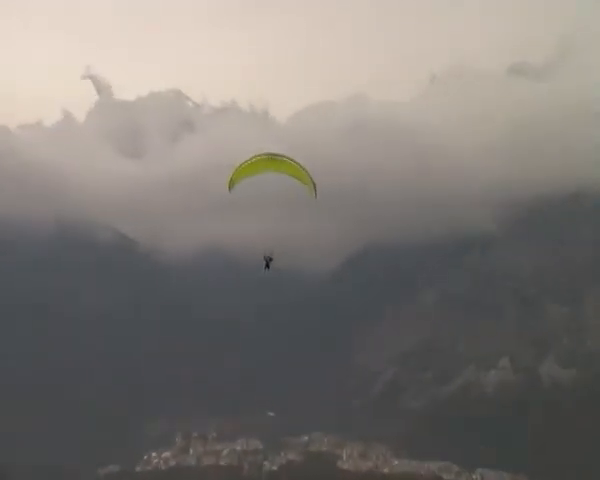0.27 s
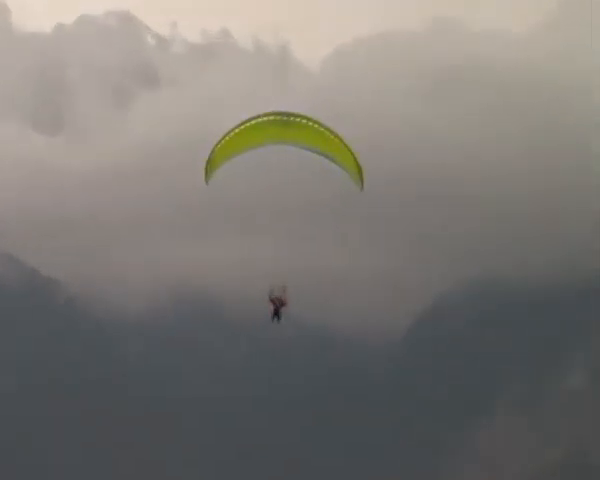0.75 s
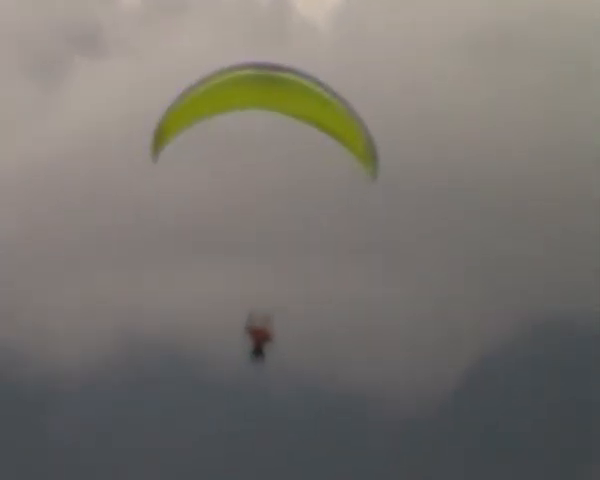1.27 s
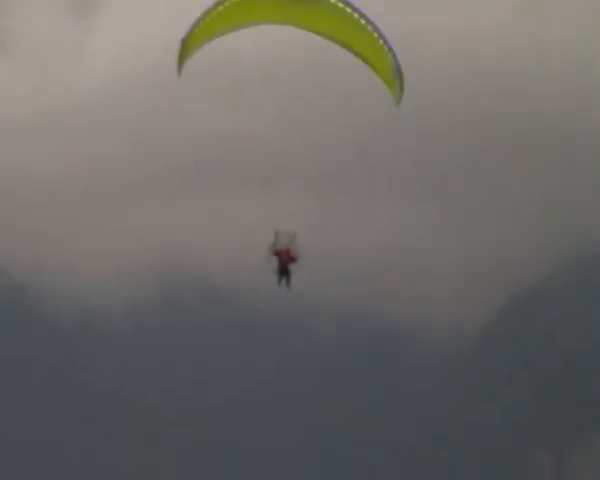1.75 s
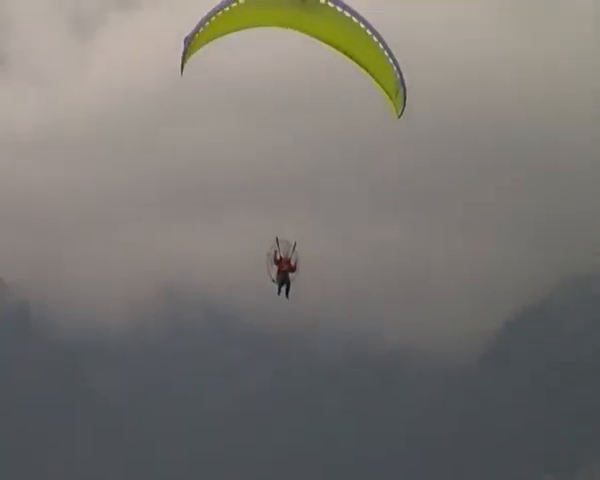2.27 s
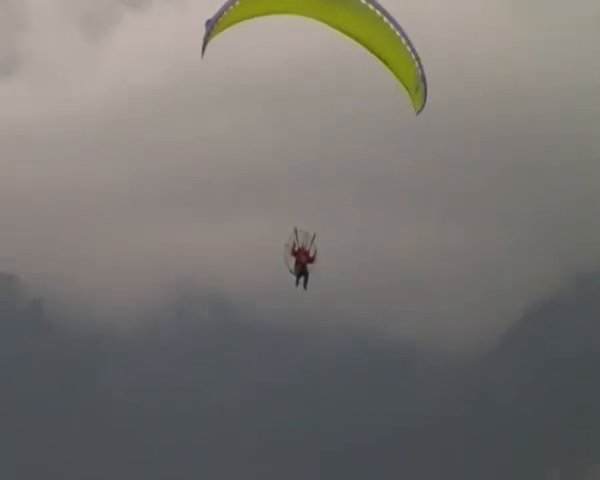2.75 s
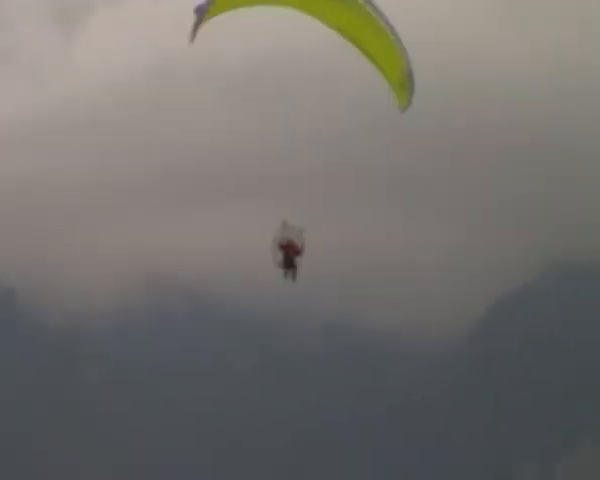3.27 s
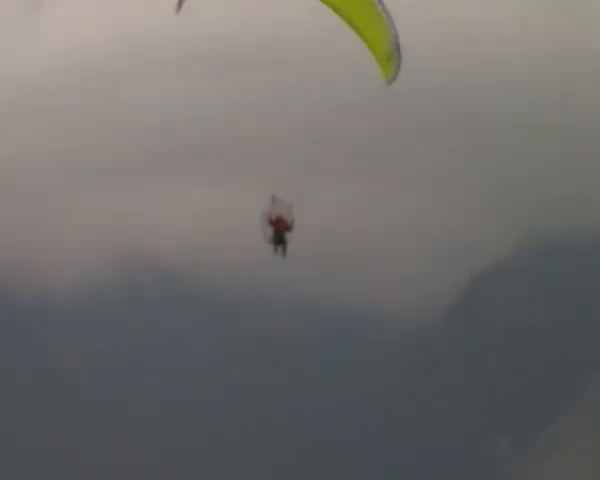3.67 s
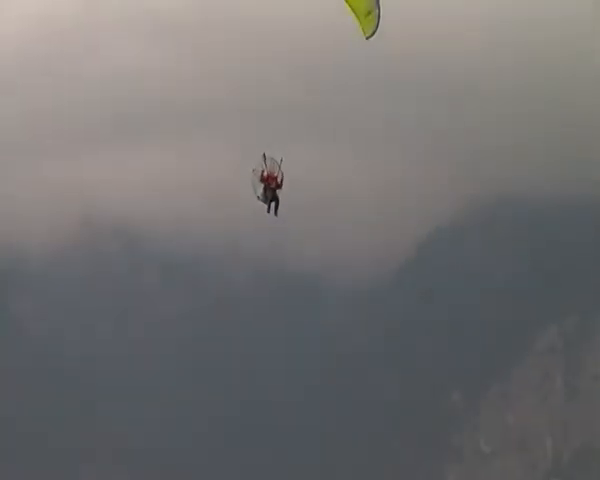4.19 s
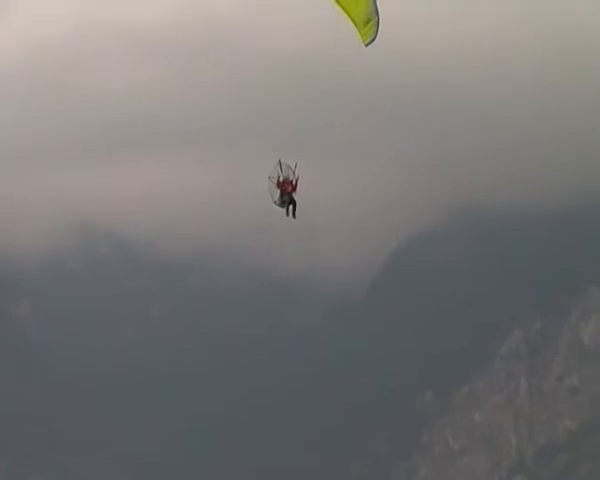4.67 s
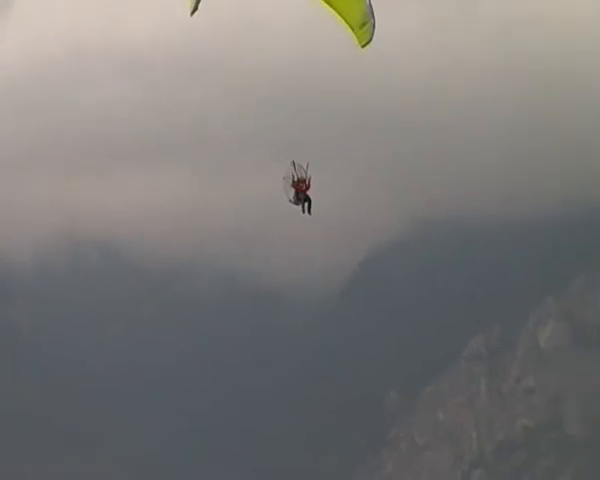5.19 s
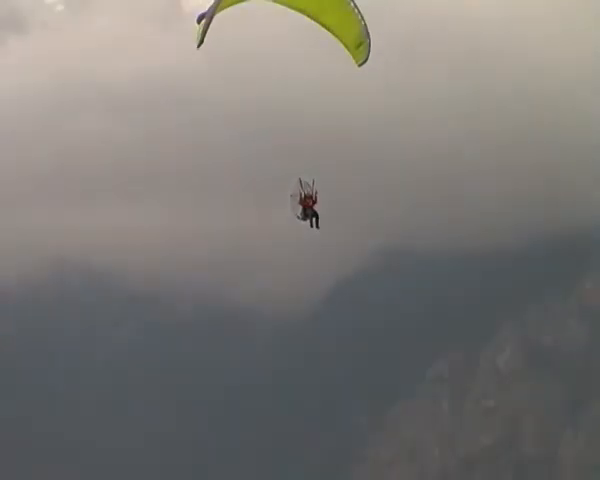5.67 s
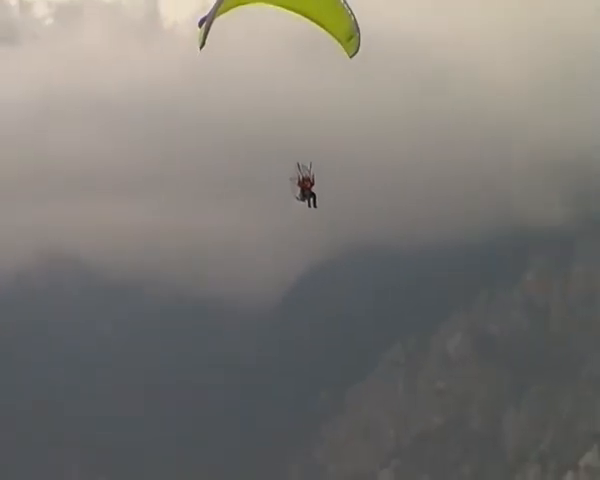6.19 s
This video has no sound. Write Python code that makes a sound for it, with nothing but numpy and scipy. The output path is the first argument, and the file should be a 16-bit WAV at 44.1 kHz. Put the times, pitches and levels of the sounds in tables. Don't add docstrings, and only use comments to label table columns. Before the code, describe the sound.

Rough wind buffets a handheld camera outdoors while a paramotor's nasal engine drone and propeller chop swell, fade under gusts, then return.

```python
import sys
import numpy as np
from scipy import signal
from scipy.fft import rfft, irfft, next_fast_len
from scipy.io import wavfile
from scipy.ndimage import uniform_filter1d, map_coordinates

SR = 44100
rng = np.random.default_rng(int(sys.argv[2]) if len(sys.argv) > 2 else 0)


def nominal_scale(level):
    x = np.asarray(level, float) / 20
    return 10 ** x


def materialize(psi):
    bounded = np.clip(np.atleast_2d(psi).T, -1, 1)
    quanta = np.round(bounded * 32767).astype(np.int16)
    wavfile.write(sys.argv[1], SR, quanta)


N = 283563
T = np.arange(N) / SR


def unit(x):
    return x / np.sqrt(np.mean(x ** 2) + 1e-20)


def along(points, hz):
    f, v = np.transpose(points)
    return np.interp(np.log(hz + 1), np.log(f + 1), v)


def curves(rows):
    s, *columns = np.transpose(rows)
    return [np.interp(T, s, column) for column in columns]


def wobble(rate):
    knots = rng.standard_normal(int(N * rate / SR) + 4)
    return map_coordinates(knots, [np.arange(N) * rate / SR])


def noise(ports):
    return rng.standard_normal((ports, N))


def filtered(x, response):
    m = next_fast_len(N + 8192)
    return irfft(rfft(x, m) * response(np.fft.rfftfreq(m, 1 / SR)), m)[..., :N]


def coloured(x, spectrum):
    return unit(filtered(x, lambda hz: nominal_scale(along(spectrum, hz))))


def treble(hz, above_hz):
    return 1 / (1 + (above_hz / (hz + 1)) ** 4)


def echo(x, share, delay, turn, above_hz):
    def response(hz):
        late = np.exp(1j * (turn - 2 * np.pi * hz * delay))
        return 1 + share * treble(hz, above_hz) * late
    return filtered(x, response)


# start_s [s], level_db [dB]
NEARNESS = [(0.0, -38), (0.08, -27.5), (0.5, -37.5), (0.85, -28.5), (1.3, -28.5), (1.75, -28.5),
            (2.05, -20), (2.42, -24.5), (2.55, -16.5), (3.05, -19), (3.2, -25.5), (3.7, -25), (4.15, -24.5),
            (4.6, -32.5), (5.0, -38.5), (5.4, -33.5), (5.8, -30.5), (6.43, -23)]
# frequency_hz [Hz], level_db [dB per Hz]
SURF_COLOUR = [(500, -20), (2000, 16), (6000, 3), (9600, -3), (11600, -28.5), (13000, -66.5)]


def surf():
    craft = nominal_scale(curves(NEARNESS)[0] - 27.5)
    sea = nominal_scale([[-59], [-56]])
    return (craft + sea) * coloured(noise(2), SURF_COLOUR)


def gusts(rows):
    power = nominal_scale(2 * -45) * np.ones(N)
    for middle, db, length in rows:
        power += nominal_scale(2 * db) * np.exp(-np.abs(2 * (T - middle) / length) ** 3)
    return power


def thuds(rows):
    over_db, cycles = 2.5, 0.809
    out, t = np.zeros(N + 2000), np.arange(-1000, 1000) / SR
    for s, db, hz in rows:
        envelope = nominal_scale(db + over_db) * np.exp(-(t * hz / cycles) ** 2)
        turn = rng.uniform(0, 2 * np.pi)
        out[round(s * SR):][:len(t)] += envelope * np.cos(2 * np.pi * hz * t + turn)
    return out[1000:N + 1000]


# middle_s [s], level_db [dB], length_s [s]
LEFT_GUSTS = [(0.104, -31, 0.085), (0.49, -25, 0.41), (0.886, -30.5, 0.21), (1.049, -26, 0.051),
              (1.145, -27, 0.015), (1.243, -28.5, 0.048), (1.372, -27.5, 0.057), (1.598, -22, 0.17),
              (1.814, -24, 0.064), (1.947, -34.5, 0.15), (2.131, -28.5, 0.05), (2.312, -28.5, 0.13),
              (3.035, -33.5, 0.13), (3.383, -28.5, 0.308), (3.694, -25.5, 0.092), (3.857, -33.5, 0.067),
              (4.031, -27, 0.1), (4.459, -21.5, 0.504), (4.938, -22, 0.18), (5.204, -31, 0.16),
              (5.767, -26.5, 0.44), (6.274, -29.5, 1)]
RIGHT_GUSTS = [(0.294, -31.5, 0.68), (0.337, -23, 0.051), (0.417, -18.5, 0.02), (0.805, -28.5, 0.27),
               (1.052, -28, 0.046), (1.161, -26, 0.021), (1.26, -25.5, 0.01), (1.518, -27.5, 0.097),
               (2.066, -31.5, 0.18), (2.643, -43.5, 0.39), (3.095, -39, 0.37), (3.358, -30, 0.03),
               (3.466, -23, 0.03), (3.675, -39.5, 0.13), (3.846, -31.5, 0.04), (3.978, -31.5, 0.013),
               (4.347, -29, 0.092), (4.591, -25.5, 0.21), (5.045, -19.5, 0.491), (5.631, -23.5, 0.299),
               (6.041, -21, 0.188), (6.279, -32.5, 0.15)]
# middle_s [s], level_db [dB], pitch_hz [Hz]
LEFT_THUDS = [(0.273, -20, 186), (0.33, -19, 220), (0.376, -12.5, 289), (0.416, -22, 302),
              (0.445, -22.5, 248), (0.532, -12, 259), (0.685, -16, 231), (0.788, -17.5, 202),
              (0.872, -17, 203), (1.047, -16, 261), (1.143, -20.5, 201), (1.231, -17.5, 243),
              (1.258, -25, 161), (1.385, -19.5, 212), (1.492, -17.5, 210), (1.529, -20.5, 223),
              (1.557, -17.5, 184), (1.627, -18, 245), (1.655, -17, 255), (1.808, -21, 175.8),
              (2.134, -24.5, 269), (2.261, -18, 183.4), (2.303, -22.5, 199), (2.341, -20, 170),
              (2.368, -21.5, 167), (3.181, -22, 189), (3.257, -21, 180), (3.304, -20.0, 177),
              (3.461, -17, 246), (3.648, -17, 262), (3.673, -21, 175), (3.711, -20.5, 192),
              (3.75, -21.5, 165), (3.883, -23, 167), (3.991, -17.5, 174), (4.048, -19, 189),
              (4.201, -17.5, 186), (4.227, -17.5, 253), (4.289, -9.5, 241), (4.325, -14, 232),
              (4.362, -17, 196), (4.388, -18, 303), (4.437, -16, 251.5), (4.474, -10.5, 213),
              (4.589, -19.5, 248), (4.617, -14.5, 260), (4.641, -11.5, 222), (4.672, -15.0, 208),
              (4.842, -17.0, 217), (4.924, -16, 240), (4.971, -14.5, 202), (5.051, -18, 240),
              (5.872, -16.0, 210), (5.922, -17.5, 217), (6.305, -21, 170)]
RIGHT_THUDS = [(0.25, -20.5, 195), (0.34, -18, 229.3), (0.417, -15.5, 243), (0.474, -28.5, 250),
               (0.687, -20, 232), (0.721, -26, 205), (0.772, -16.5, 218), (0.828, -27.5, 199),
               (0.911, -22, 236), (1.043, -18.5, 267), (1.068, -19, 274), (1.165, -29.5, 153),
               (1.258, -19.5, 165), (2.013, -19.5, 324), (2.048, -22.5, 174), (2.077, -26, 214),
               (2.139, -25, 196), (3.163, -25, 155), (3.197, -21.5, 217), (3.354, -19.5, 192),
               (3.464, -18, 212), (3.658, -25, 311), (3.751, -24.5, 166), (3.857, -26, 211),
               (3.984, -23, 183), (4.359, -20, 238), (4.53, -21.5, 275), (4.595, -18.5, 219.3),
               (4.658, -13.5, 208.5), (4.747, -18.5, 217), (4.797, -13.5, 181.3), (4.827, -12, 292.8),
               (4.933, -12, 249), (5.016, -12, 285.2), (5.142, -15.5, 262.6), (5.167, -12, 260),
               (5.199, -12.5, 257.3), (5.256, -14, 181.2), (5.308, -12.5, 238), (5.395, -18.5, 190),
               (5.47, -16.5, 186), (5.524, -17.5, 212), (5.607, -12, 337), (5.651, -12, 275.2),
               (5.697, -16, 242.2), (5.723, -15, 223.6), (5.749, -13.5, 240.5), (5.816, -19.5, 264),
               (5.97, -16.5, 283.4), (6.028, -13.5, 228), (6.053, -17, 198.6), (6.091, -12, 199.8),
               (6.147, -16.5, 256.8), (6.249, -21.5, 192), (6.272, -21.5, 201)]
# frequency_hz [Hz], level_db [dB per Hz]
BUFFET_COLOUR = [(30, -50), (80, -10.5), (130, -3.5), (200, -1.5), (380, -7), (540, -13), (1300, -29),
                 (3000, -51), (6000, -91.5)]
RUMBLE_COLOUR = [(15, -42.5), (30, -20.5), (60, -9.5), (100, -5), (160, -6.5), (300, -32.5), (800, -76.5)]
CRACK_COLOUR = [(300, -27), (1500, 0), (4500, 3), (9600, -2.5), (10800, 1), (12000, -60)]


def wind():
    power = np.array([gusts(LEFT_GUSTS), gusts(RIGHT_GUSTS)])
    lumps = nominal_scale([1.7 * wobble(18) + 4.13 * wobble(130) for _ in range(2)])
    flow = coloured(lumps * noise(2), BUFFET_COLOUR)
    evenness = 0.542
    recent = np.abs(uniform_filter1d(flow ** 2, size=SR // 50))
    flow = unit(flow / (recent + .05) ** (evenness / 2))
    buffet = nominal_scale(-0.13) * np.sqrt(power) * flow + np.array([thuds(LEFT_THUDS), thuds(RIGHT_THUDS)])

    wind_db = 10 * np.log10(uniform_filter1d(power.mean(axis=0), size=SR // 10))
    deep_db = 0.12 * (wind_db - wind_db.mean()) + 1.8 * wobble(18)
    lull_s, lull_length_s, lull_db = 2.6, .28, -10
    deep_db = deep_db + lull_db * np.exp(-(2 * (T - lull_s) / lull_length_s) ** 2)
    port_db = np.array([[-34], [-36.5]])
    rumble = nominal_scale(port_db + deep_db) * coloured(noise(2), RUMBLE_COLOUR)

    swing = 0.669 * np.tanh(buffet / 0.7516)
    steep = np.abs(np.gradient(swing, axis=1))
    ticks = np.maximum(steep - .006, 0) * noise(2)
    ticks = filtered(ticks, lambda hz: nominal_scale(along(CRACK_COLOUR, hz)))
    return swing + rumble + nominal_scale(1.5) * ticks


# start_s [s], peak_db [dB], left_minus_right_db [dB]
HARD_BLOWS = [(0.1094, -38, -11.5), (0.1448, -37.5, -14.5), (0.251, -39, 6), (0.2693, -41, -11),
              (0.327, -46.5, -5), (0.3421, -48, 8), (0.415, -38.5, -4), (0.4931, -42.5, -19),
              (0.881, -37, 8), (1.057, -40, 6.5), (1.253, -38, -7.5), (1.351, -41, 15),
              (1.391, -36.5, 12.5), (1.6257, -42.5, 2), (1.6767, -40, 14.5), (3.337, -42, -10),
              (3.745, -36.5, -2), (3.8315, -39, 5), (3.856, -42, -26), (3.8858, -37, 8), (4.2885, -39, 4),
              (4.3903, -44.5, -9), (4.4729, -42, 6), (4.5387, -41, -3.5), (4.668, -41.5, 8),
              (4.706, -39, 14.5), (5.053, -45.5, -18.5), (5.3948, -32.5, -15), (5.468, -38, -20),
              (5.544, -48.5, 9)]


def cracks():
    out, t = np.zeros((2, N + 800)), np.arange(800) / SR
    for s, db, pan_db in HARD_BLOWS:
        burst = nominal_scale(db + 3 - 60 * t / .018) * rng.standard_normal((2, len(t)))
        balance = nominal_scale([[min(pan_db, 0)], [-max(pan_db, 0)]])
        out[:, round(s * SR):][:, :len(t)] += burst * balance
    return filtered(out[:, :N], lambda hz: nominal_scale(along(CRACK_COLOUR, hz)))


# start_s [s], depth_db [dB], fall_s [s]
GAIN_DUCKS = [(0.087, 9, 0.054), (0.254, 4, 0.022), (0.378, -0.32, 0.012), (0.414, 4.5, 0.012),
              (0.676, 1.5, 0.0613), (0.875, 8, 0.011), (0.949, 4.5, 0.0387), (1.037, 7, 0.0246),
              (1.23, 7.5, 0.0497), (1.377, 7, 0.0147), (1.556, 2, 0.052), (1.61, 6.5, 0.072),
              (1.92, 2.5, 0.038), (2.036, 7, 0.0085), (2.139, 6.5, 0.038), (2.306, 3, 0.0905),
              (2.532, 1.5, 0.027), (2.923, 4.5, 0.012), (3.07, 7.5, 0.0505), (3.278, 4.5, 0.049),
              (3.441, 4, 0.0987), (3.746, 10, 0.01), (3.831, 9.5, 0.0642), (3.993, 4, 0.092),
              (4.154, 3, 0.129), (4.281, 7.5, 0.086), (4.455, 6, 0.031), (4.653, 3, 0.0905),
              (5.07, 6.5, 0.0163), (5.397, 4.5, 0.0203)]


def ducking():
    recover_db_per_s = 65
    down_db = np.zeros(N)
    for s, depth_db, fall in GAIN_DUCKS:
        falling = depth_db * (T - s) / fall
        recovering = depth_db - recover_db_per_s * (T - s - fall)
        down_db += np.maximum(np.minimum(falling, recovering), 0)
    return nominal_scale(-down_db)


# frequency_hz [Hz], level_db [dB per Hz]
THUMP_COLOUR = [(60, -35.5), (150, -16), (240, 13), (450, 0.5), (650, 8), (900, 2.5), (1050, 3.5),
                (1200, 2), (1450, 1), (1800, 0.5), (2300, 0.5), (3200, -9), (5000, -16.5), (8000, -66.5),
                (11500, -60.5)]
ROAR_COLOUR = [(88, -54.5), (150, -19), (291, -6), (480, -12.5), (663, 0.5), (738, -6.5), (807, 0.5),
               (867, -9), (1360, -9), (1700, -7.5), (1880, -12), (2200, -8.5), (3040, -12.5), (8270, -37.5),
               (10800, -104), (14100, -134), (22000, -120)]


def propeller(passes):
    count = np.floor(passes).astype(int)
    size = nominal_scale(rng.normal(0, 0.39, count.max() + 1))[count]
    thumps = np.diff(count, prepend=count[0]) * size
    tearing = np.exp(-(passes % 1) / .17) * size * rng.standard_normal(N)
    blade = coloured(-thumps, THUMP_COLOUR) + 0.366 * coloured(tearing, ROAR_COLOUR)
    return unit(echo(blade, share=0.41, delay=0.0051, turn=0, above_hz=3100))


# start_s [s], turned_away [0-1], note_db [dB], upper_db [dB]
PILOT_TURN = [(0, 0.21, -6, -6.5), (0.65, 0.09, -9, -4), (1.3, 0.1, -4.5, -4.5), (1.9, 0.17, -1, 1),
              (2.5, 0.18, -0.8, 4.5), (3.05, 0.23, -1.65, 2.5), (3.6, 0.14, -0.5, 2.77),
              (4.1, 0.41, -1.97, 2), (4.6, 0.31, -2.28, 5.5), (5.1, 0.84, -2, 5.5), (5.6, 0.93, -4.25, 0),
              (6.0, 0.67, -1.5, 5), (6.43, 0.8, -1.83, 3.5)]
# start_s [s], air_db [dB], air_treble_db [dB], high_partials_db [dB]
CAGE_BEAM = [(0, 0, -1, -1), (.4, 0, 0, 0), (.8, 0, -0.5, 1), (1.3, 0, -0.5, -0.5), (1.7, 0, -1, 1),
             (2.02, 0, 0.5, 1), (2.3, 0, 0, 1.5), (2.6, 0, 1, 0), (3.0, 0, 1, -0.5), (3.3, -0.5, 1, -0.5),
             (3.7, 0, -0.5, -1), (4.1, -1, 0.5, -7.5), (4.5, 0, 0.5, -2), (4.9, -1.5, -2, -5),
             (5.4, 0, 1, -0.5), (5.8, -0.5, 0.5, 1.5), (6.2, 0.5, 2.5, 2.5), (6.43, 0, -3.5, -1)]
# multiple [of firing rate], level_db [dB]
PARTIALS_FACING = [(1, -17), (2, -26), (3, -24.5), (4, -14), (5, 1), (6, 10.5), (7, -1), (8, -6), (9, -9.5),
                   (10, -1), (11, -7.5), (12, -4), (13, -14.5), (14, -27), (15, -42.5), (16, -15),
                   (17, -26.5), (18, -19), (19, -19), (20, -32), (21, -37), (22, -42), (23, -23.5),
                   (24, -24.5), (25, -25.5), (26, -39), (27, -46.5), (35, -41.5), (36, -44), (38, -47.5),
                   (39, -44)]
PARTIALS_AWAY = [(1, -16.5), (2, -4.5), (3, -6.5), (4, -15), (5, 0), (6, 5), (7, -9.5), (8, -2.5), (9, -11),
                 (10, -5.5), (11, -3.5), (12, -5.5), (13, -12.5), (14, -11), (15, -28.5), (16, -20.5),
                 (17, -50.5), (18, -37), (19, -41), (20, -23.5), (21, -34.5), (22, -43.5), (23, -21),
                 (24, -22.5), (25, -20.5), (26, -35), (27, -26.5), (35, -27.5), (36, -29), (38, -33.5),
                 (39, -34)]
# middle_s [s], gain_db [dB]
TONE_FLARES = [(.245, 4), (.95, 3.5), (1.55, 8), (2.019, 4), (2.62, 1.5), (2.78, 2.5), (2.903, 4.5),
               (4.16, 3), (4.94, 4), (5.385, 6), (5.71, 4.5), (5.84, 1), (6.2, 2.5), (6.38, 3)]


def exhaust(firings, away, near_db):
    flare_length_s, upper_share = 0.0356, .6
    note_db, upper_db = curves(PILOT_TURN)[1:]
    high_db = curves(CAGE_BEAM)[2]
    top_db = 0.36 * away * (near_db - near_db.mean())
    flare_db = sum(db * np.exp(-(2 * (T - s) / flare_length_s) ** 2) for s, db in TONE_FLARES)
    drift = .004 * wobble(25)
    out = np.zeros(N)
    for (k, facing_db), (_, away_db) in zip(PARTIALS_FACING, PARTIALS_AWAY):
        aim_db = note_db * ((k == 6) + .5 * (k == 5))
        aim_db = aim_db + (upper_db - (1 - upper_share) * flare_db) * (k > 8)
        aim_db = aim_db + high_db * (k > 13) + top_db * (k > 19)
        level_db = facing_db + away * (away_db - facing_db) + aim_db + 1.74 * wobble(9)
        late = .52 * max(k - 7.5, 0)
        phase = 2 * np.pi * (k * (firings + drift) - late) + .2 * wobble(14)
        out -= nominal_scale(level_db) * np.cos(phase)
    steady = out / np.sqrt(uniform_filter1d(out ** 2, size=SR // 4))
    return nominal_scale(flare_db + 0.446 * note_db) * steady


# frequency_hz [Hz], level_db [dB per Hz]
RASP_COLOUR = [(530, -41), (900, -6.5), (958, -9), (1010, -3.5), (1300, -1), (1580, 2.5), (1920, -23),
               (2110, -11.5), (2740, -17.5), (3140, -16), (3550, -15.5), (8520, -40.5), (10800, -80.5),
               (14100, -115), (22000, -120)]
RING_COLOUR = [(2400, -31), (2900, -4.5), (3150, 5.5), (3350, -8.5), (3600, -21), (4400, -15.5),
               (4750, -26.5), (5050, -13), (5400, -28), (6000, -41.5)]


def pipe_noise(firings):
    puffs = np.exp(-((firings - .45) % 1) / 0.25)
    rasp = coloured(puffs * rng.standard_normal(N), RASP_COLOUR)
    outlet = np.clip((T - 5.72) / 0.27, 0, 1)
    ring = nominal_scale(-20) * outlet * coloured(puffs * rng.standard_normal(N), RING_COLOUR)
    return rasp, ring


# frequency_hz [Hz], width_hz [Hz], gain_db [dB]
CAGE_BEHIND = [(2250, 700, -1.5), (2827, 160, -3), (3565, 250, -3), (4500, 246, 4), (4733, 180, -7),
               (5020, 250, 5), (5355, 200, -5), (5650, 140, 4), (5950, 150, -4), (6230, 250, 1)]


def off_the_cage(air, away, near_db):
    def behind(hz):
        return nominal_scale(sum(db * np.exp(-((hz - c) / w) ** 2) for c, w, db in CAGE_BEHIND))
    facing = echo(air, share=0.48, delay=0.00117, turn=4.1, above_hz=1500)
    turned = filtered(air, behind)
    clear = np.clip((near_db + 28) / 8, 0, 1)
    air = air + clear * (facing - air)
    back_view = np.clip((away - 0.18) / (0.396 - 0.18), 0, 1)
    air = air + back_view * (turned - air)
    treble_db = curves(CAGE_BEAM)[1]
    return air + (nominal_scale(treble_db) - 1) * filtered(air, lambda hz: treble(hz, 2500))


# start_s [s], rate_hz [firings per s]
ENGINE_SPEED = [(0.0, 135.23), (0.4, 135.28), (0.8, 135.1), (1.2, 134.57), (1.6, 134.57), (2.0, 134.23),
                (2.4, 134.18), (2.8, 133.98), (3.2, 133.21), (3.6, 132.49), (4.0, 132.09), (4.4, 130.86),
                (4.8, 131.12), (5.2, 130.14), (5.6, 129.06), (6.0, 128.57), (6.42, 128.38)]


def paramotor():
    near_db, = curves(NEARNESS)
    away = curves(PILOT_TURN)[0]
    firings = np.cumsum(curves(ENGINE_SPEED)[0]) / SR
    rasp, ring = pipe_noise(firings)
    wash = coloured(rng.standard_normal(N), ROAR_COLOUR) * nominal_scale(2.15 * wobble(30))
    belt = 2 / 3.636
    air = nominal_scale(2.5 - 3.7 * away) * propeller(belt * firings)
    air = air + nominal_scale(2.5 - 2.1 * away) * wash
    air = air + nominal_scale(-6.0 + 3.3 * away) * rasp
    air = off_the_cage(air, away, near_db)
    beam_db = curves(CAGE_BEAM)[0]
    air_db = -9 + beam_db - 1.5 * away + 0.051 * (near_db - near_db.mean())
    tones = nominal_scale(-0.2352 + 1.5 * away) * exhaust(firings, away, near_db)
    return nominal_scale(near_db) * (tones + ring + nominal_scale(air_db) * air)


def scene():
    lag_s = 2 / SR

    def ports(hz):
        shade = nominal_scale((0.1256 + hz / 5000) * np.array([[-1], [1]]))
        return shade * np.exp(-1j * np.pi * hz * lag_s * np.array([[1], [-1]]))
    return ducking() * (filtered(paramotor(), ports) + surf()) + wind() + cracks()


def roll_off(x):
    return signal.sosfilt(signal.butter(12, 11300, fs=SR, output="sos"), x)


def record(dry):
    rounded = dry / (1 + np.abs(dry / .85) ** 4) ** (1 / 4)
    mix = filtered(rounded, lambda hz: 1 / (1 + (hz / 11500) ** 40))
    return roll_off(mix)


dry = scene()
out = record(dry)
materialize(out)
```